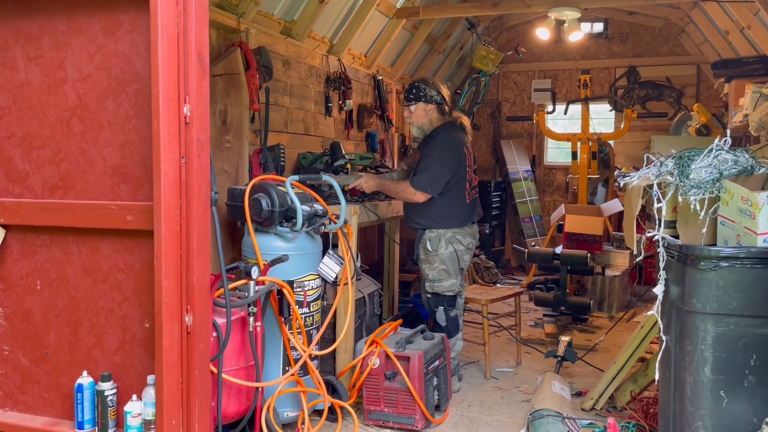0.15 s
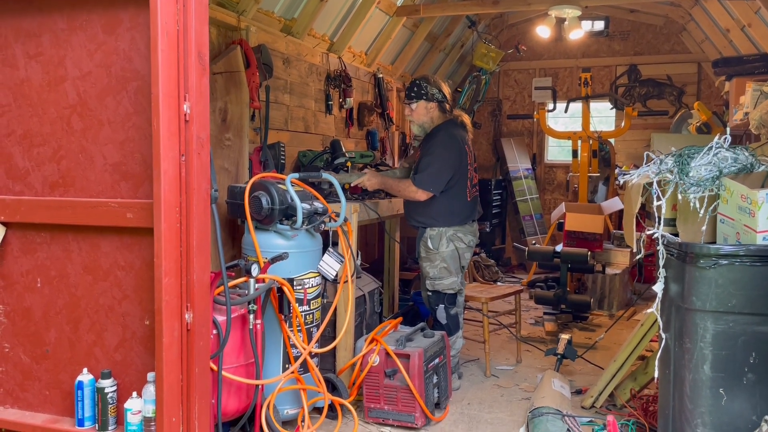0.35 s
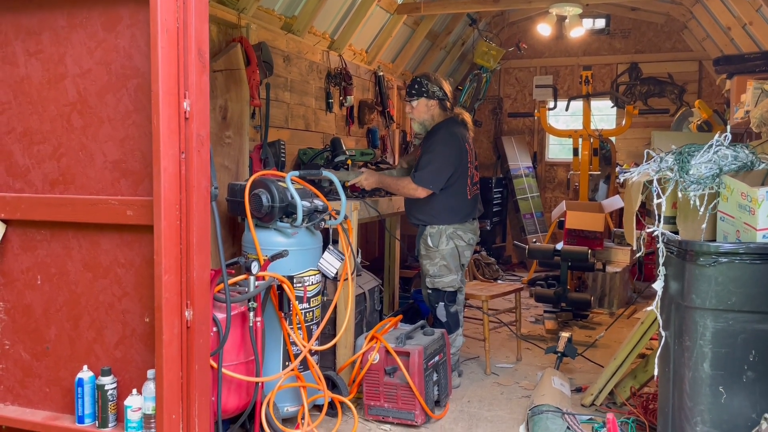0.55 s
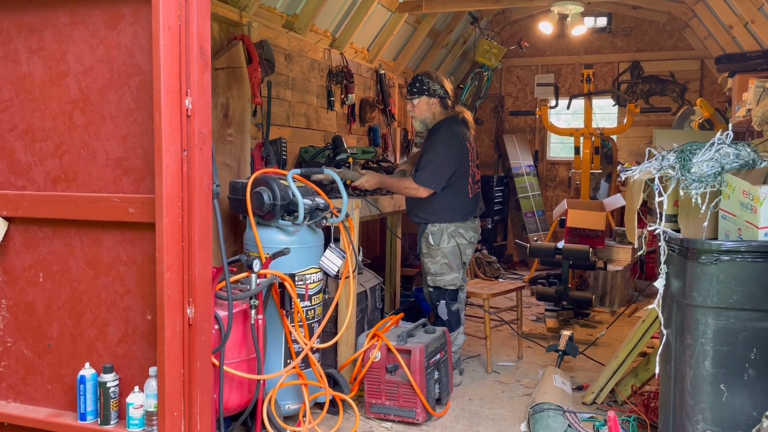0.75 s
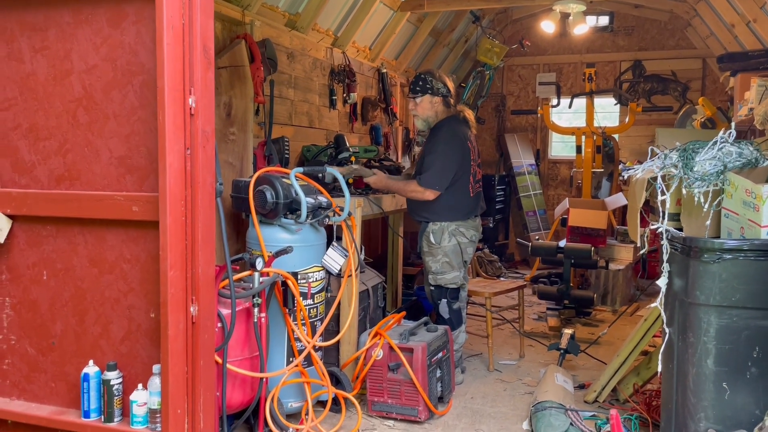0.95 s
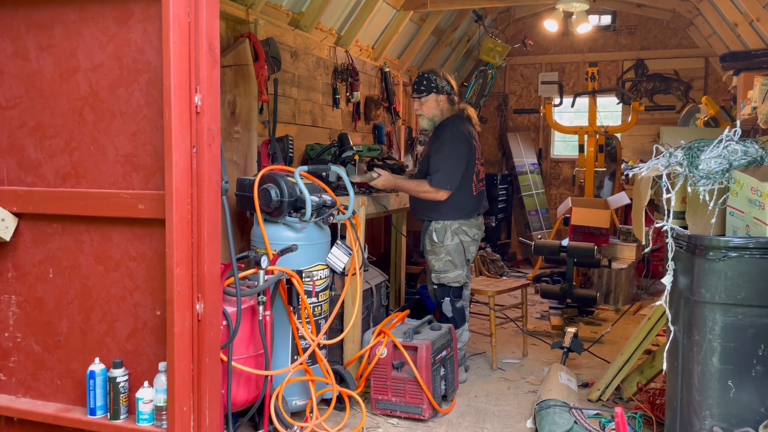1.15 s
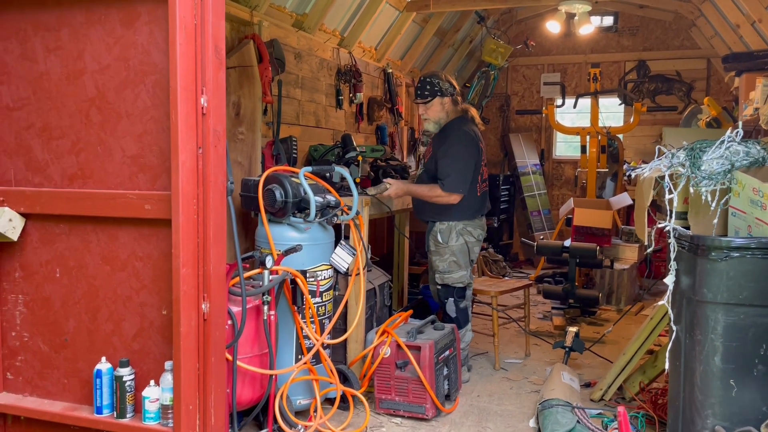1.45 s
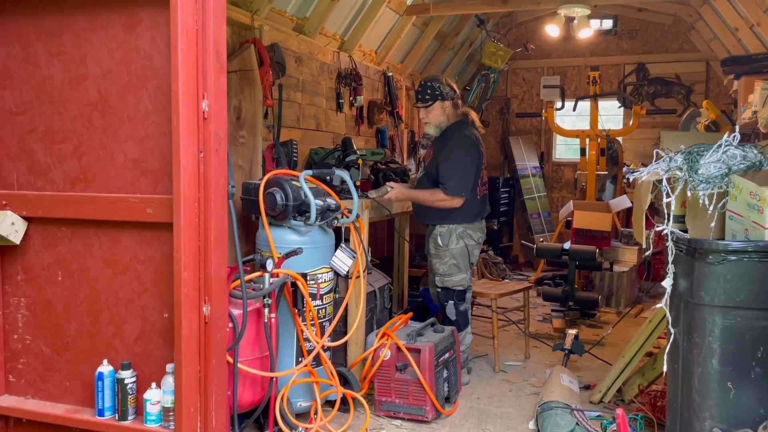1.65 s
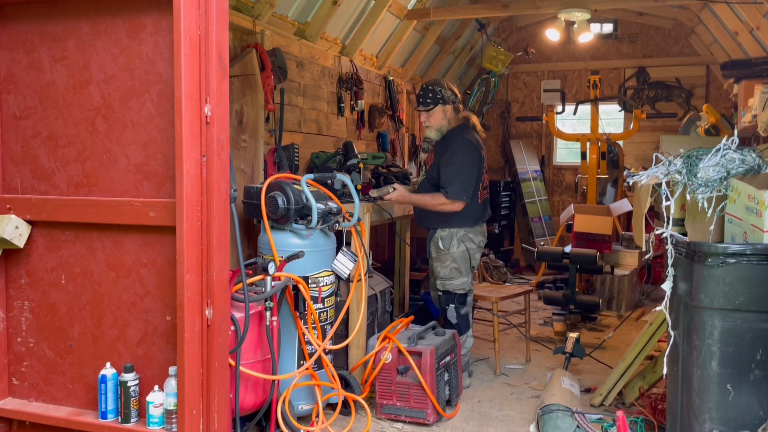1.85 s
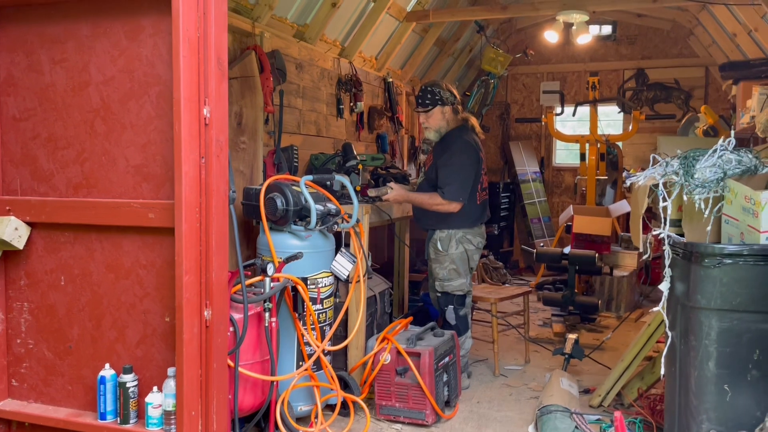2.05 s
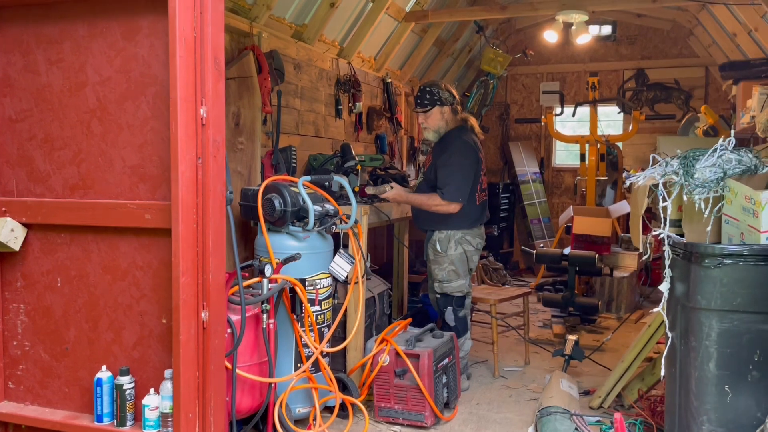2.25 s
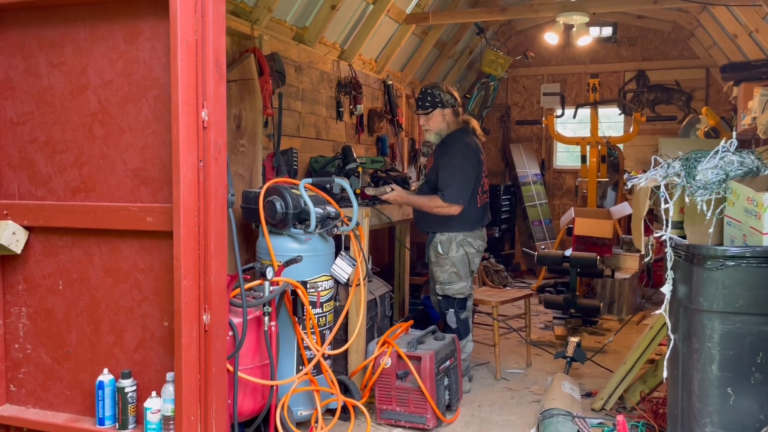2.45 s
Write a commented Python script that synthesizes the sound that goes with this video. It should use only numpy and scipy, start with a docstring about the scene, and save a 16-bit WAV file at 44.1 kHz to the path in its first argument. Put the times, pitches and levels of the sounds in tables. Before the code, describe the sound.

A power sander rasps on wood, then lifts off and idles with a low throb.

```python
"""A buzzing, rasping power sander is heard first, pressed on a wooden bar in a small shed. The small engine of
the generator feeding it sags with each push, while grit scrapes the wood and the bar rings and rattles. Near
0.9 s the pad lifts off, and the engine's drone falls an octave into a lighter throb, whose pattern repeats only
every second turn. A bird then sings faintly outside."""
import sys
import numpy as np
from scipy import signal
from scipy.fft import rfft, irfft
from scipy.io import wavfile

SR = 44100
rng = np.random.default_rng(int(sys.argv[2]) if len(sys.argv) > 2 else 0)


def to_wav(sig):
    """Store sig (one row per channel, or 1-D mono) as 16-bit WAV at the path in sys.argv[1].

    Samples outside -1..1 are clipped; the rate is SR.
    """
    pcm = np.clip(np.atleast_2d(sig), -1, 1) * 32767
    pcm = np.round(pcm).astype(np.int16)
    wavfile.write(sys.argv[1], SR, pcm.T)  # frames by channels


N = 114660
BIN_HZ = np.fft.rfftfreq(N, 1 / SR)
IDLE_S, IDLE_FADE_S = 0.894, 0.257  # middle and length of the change to the throb


def motor(turns):
    """Period doubling: the buzz repeats every turn, the unloaded throb every second turn."""
    # Partials under load. Each row: multiple of the turn rate, relative level in dB.
    loaded_partials = [(1, -6), (2, 1), (3, -3.5), (4, -5), (5, -7), (6, -14), (7, -10), (8, -24), (9, -18),
                       (10, -17.5), (11, -18.5), (12, -18.5), (13, -16), (14, -23), (15, -40), (16, -23.5),
                       (17, -19), (18, -35), (19, -23.5), (20, -27.5), (21, -24.5), (22, -20)]
    # Partials unloaded. Each row: multiple of half the turn rate, relative level in dB.
    idle_partials = [(1, -17), (2, -2.5), (3, 1), (4, -12.5), (5, -7.5), (6, -10), (7, -24), (8, -14),
                     (9, -31), (10, -15), (11, -19.5), (12, -22), (13, -14), (14, -11.5), (15, -22),
                     (16, -28.5), (17, -17), (18, -19), (19, -23), (20, -36), (21, -27), (22, -22.5),
                     (23, -20.5), (24, -20), (25, -31), (26, -18), (27, -40.5), (28, -33), (29, -37),
                     (30, -33), (31, -36), (32, -32.5), (33, -34.5), (34, -43), (35, -33.5), (36, -32),
                     (37, -25), (38, -35), (39, -35), (40, -30), (41, -33.5), (42, -40.5), (43, -29.5),
                     (44, -29.5), (45, -37.5), (46, -33), (47, -30), (48, -47.5)]
    # Envelope of the buzz. Each row: time in seconds, level in dB.
    buzz_db = [(0, -24), (.1, -23), (.26, -21.5), (.36, -21.5), (.48, -23.3), (.64, -21.5), (.82, -21.5),
               (.87, -26), (.91, -32), (.96, -41), (1.05, -83)]
    # Faint engine whines. Each row: frequency in Hz at 59.5 turns per second, level in dB.
    whines = [(1098, -58.5), (1190, -58), (3779, -73.5), (4721, -74)]
    buzz = drone(turns, loaded_partials, sharp=0.88, smear=0.1097, scatter=4.5, rough=0.34, spread=0.96)
    throb = drone(turns / 2, idle_partials, sharp=0, smear=1.3, scatter=3.3, rough=.14, spread=0.7)
    whine = sum(amp(db) * np.sqrt(2) * np.sin(2 * np.pi * hz * turns / 59.5) for hz, db in whines)
    throb_gain = amp(-23.5) * np.sqrt(ramp(IDLE_S, IDLE_FADE_S))
    return throb_gain * throb - amp(curve(buzz_db)) * buzz + whine


def rotation():
    """Turns are the integral of speed, which sags under load and hunts when the motor runs free."""
    # Motor speed. Each row: time in seconds, turns per second.
    speed = [(0, 58.1), (.11, 57.3), (.23, 58.2), (.32, 58.9), (.38, 57.8), (.45, 58.8), (.52, 57.3),
             (.6, 57.7), (.7, 59.1), (.8, 58.9), (.87, 59.6), (1.1, 59.5), (2.6, 59.5)]
    hunt_hz = 11 * (1 + 0.14 * wander(3.7))
    hunt = np.sin(2 * np.pi * np.cumsum(hunt_hz) / SR) * (1 + 0.13 * wander(3))
    unsteadiness = .004 * hunt * ramp(IDLE_S, IDLE_FADE_S) + .003 * wander(45)
    return np.cumsum(curve(speed) * (1 + unsteadiness)) / SR


def drone(cycles, partials, sharp, smear, scatter, rough, spread):
    """Fourier series of one thump per cycle; upper partials spread in time and waver the most."""
    orders, db = np.transpose(partials)
    log_gain = np.r_[db.min(), db, db.min(), db[::-1]] * np.log(10) / 20
    lags = np.imag(signal.hilbert(log_gain))[1:]  # minimum phase gives a sharp onset
    sides = np.array([[.5], [-.5]])
    tone, shared_waver = np.zeros((2, N)), wander(32)
    for n, level, lag in zip(orders, db, lags):
        height = n / orders[-1]
        astray, apart = height * rng.standard_normal(2)
        offset = scatter * astray + spread * apart * sides - sharp * lag - smear * n ** 2
        waver = 1 + rough * np.sqrt(height) * (shared_waver + wander(12))
        tone += amp(level) * waver * np.cos(2 * np.pi * n * cycles + offset)
    return unit(tone) * amp(-3 * sides)  # 3 dB stronger on the right


def sanding(turns):
    """Friction noise: grit rasps in a surge per turn, hisses when pushed hard, and catches twice."""
    # Pressure of the abrasive. Each row: time in seconds, relative rasp level in dB.
    pressure = [(0, -43.5), (.04, -45), (.09, -41.5), (.15, -38.5), (.26, -37), (.31, -44.5), (.352, -48.5),
                (.375, -40), (.42, -48.5), (.46, -41), (.51, -44.5), (.55, -49.5), (.565, -45), (.605, -42),
                (.68, -51.5), (.79, -57), (.87, -60), (.95, -63)]
    # Spectra of the rasp and the fine hiss. Each row: frequency in Hz, relative density in dB.
    rasp_spectrum = [(500, -29), (950, -11), (1200, -4), (1450, 1.5), (1800, -5.5), (2100, 0.5),
                     (2400, -6.5), (2600, -8), (3500, -12), (3900, -9.5), (5000, -13), (7300, -19.5),
                     (9000, -34), (13000, -44)]
    hiss_spectrum = [(500, -38), (5000, -23), (7500, -4), (9500, -0.5), (10800, 4.5), (11800, -5),
                     (13700, -13)]
    # The abrasive catches on the wood. Each row: start in seconds, initial level in dB.
    catches = [(0.362, -36), (0.558, -30.5)]
    contact = 1 - ramp(0.89, 0.24)  # the pad lifts
    push = amp(curve(pressure) + 0.92 * wander(40)) * pulses(turns, depth=0.9, decay_cycles=0.32)
    rasp_db = spectrum(rasp_spectrum)
    rasp = push * amp(6.5) * mic_pair(grit(), amp(rasp_db))
    wood = bar(turns)
    hiss = amp(-45.5) * (push / amp(-38)) ** 0.96 * mic_pair(grit(), amp(spectrum(hiss_spectrum)))
    snag, t = np.zeros(N), np.arange(SR // 10) / SR
    for start, db in catches:
        add(snag, start, amp(db) * np.exp(-t / 0.0099))
    return contact * (rasp + wood + hiss) + snag * mic_pair(grit(), amp(0.5 * rasp_db))


def grit():
    """Shot noise: many tiny scratches of uneven size, in two independent streams."""
    per_second, spread_db = 9000, 1.5
    size = amp(spread_db * np.minimum(rng.exponential(1, N), 4))
    struck = rng.random(N) < per_second / SR
    return unit(size * struck * rng.standard_normal((2, N)))


def bar(turns):
    """Forced vibration: grit rings the bar and the sander's shell, and the bar rattles on the bench."""
    # Modes of bar and shell. Each row: frequency in Hz, width in Hz, relative level in dB.
    modes = [(592, 147, -1), (990, 67, -0.5), (1190, 205, -1), (1700, 110, -0.5), (1818, 164, 3),
             (2366, 120, -4.5), (2730, 55, -10), (3460, 84, -13), (3820, 110, -11), (4094, 52, -8),
             (4540, 46, -13), (5160, 69, -15.5), (6020, 90, -21)]
    # Envelopes of the ringing and the rattle. Each row: time in seconds, relative level in dB.
    ring_db = [(0, -40), (.05, -41.5), (.09, -28), (.25, -27), (.3, -37), (.35, -41.5), (.38, -32),
               (.42, -36), (.47, -41), (.55, -36), (.565, -30.5), (.6, -28), (.625, -40), (.7, -38),
               (.8, -40.5), (.87, -46), (.95, -51)]
    rattle_db = [(0, -34.5), (.04, -32.5), (.13, -28.5), (.25, -32), (.33, -34.5), (.4, -29.5),
                 (.46, -35.5), (.53, -32.5), (.66, -29), (.75, -37), (.8, -29), (.86, -34.5), (.93, -42)]
    # Spectrum of the rattle. Each row: frequency in Hz, relative density in dB.
    rattle_spectrum = [(30, -47), (70, 6.5), (150, -9.5), (330, 6), (480, -2.5), (720, 1), (870, -14),
                       (1020, -8.5), (1500, -12.5), (2100, -17), (3000, -26), (8000, -52)]
    response = sum(amp(db) / (1 + 2j * (BIN_HZ - hz) / width) ** 2 for hz, width, db in modes)
    ring = mic_pair(grit() * pulses(turns, depth=1.4, decay_cycles=0.28), response)
    knocks = grit() * pulses(turns, depth=1.3, decay_cycles=0.33)
    rattle = mic_pair(knocks, amp(spectrum(rattle_spectrum)))
    return amp(curve(ring_db) - 0.5) * ring + amp(curve(rattle_db) + 2.5) * rattle


def clatter(turns):
    """Amplitude modulation: mechanical noise and exhaust hiss pulse with the engine."""
    # Spectrum of the engine noise. Each row: frequency in Hz, relative density in dB.
    noise_spectrum = [(25, -41), (80, -16.5), (270, -23), (400, -17.5), (470, -29), (600, -26), (770, -27),
                      (860, -32.5), (1150, -32.5), (1650, -34), (2600, -40.5), (4800, -50.5), (7300, -59),
                      (9700, -60.5), (13000, -68)]
    gate = pulses(turns / 2, depth=0.33, decay_cycles=0.4) * pulses(turns, depth=0.56, decay_cycles=0.19)
    return amp(-37.5) * mic_pair(gate * rng.standard_normal((2, N)), amp(spectrum(noise_spectrum)))


def shed(direct):
    """Reverberation: dense reflections from the plank walls die away exponentially."""
    t60_s, delay_s, per_second, wet = 0.31, .004, 2000, amp(-6)
    t = np.arange(SR // 2) / SR
    tail = rng.standard_normal(len(t)) * (rng.random(len(t)) < per_second / SR)
    tail *= (t > delay_s) * amp(-60 * t / t60_s)
    reflections = signal.fftconvolve(direct, tail[None] / np.linalg.norm(tail), axes=1)[:, :N]
    return (direct + wet * reflections) / np.hypot(1, wet)


def bird():
    """Frequency modulation: gliding whistles from outside, blurred by echoes."""
    # Song. Each row: start and length in seconds, first, middle and last pitch in Hz, relative dB.
    notes = [(1.407, .04, 2520, 2705, 2800, -55), (1.495, 0.081, 3320, 3450, 3320, -55),
             (1.836, 0.055, 3210, 2950, 2940, -51), (1.895, .09, 3070, 3460, 3230, -49),
             (1.928, 0.048, 2500, 2540, 2720, -51), (1.995, .045, 2690, 2470, 2240, -49),
             (2.237, 0.037, 2710, 2800, 2846, -59), (2.31, 0.069, 3150, 3380, 3420, -52),
             (2.373, 0.031, 2900, 3118, 3400, -49.5), (2.437, 0.07, 2720, 2550, 2400, -50.5),
             (2.524, 0.032, 2690, 2540, 2420, -48)]
    song = np.zeros(N)
    for start, length, first, middle, last, db in notes:
        progress = np.arange(0, length, 1 / SR) / length
        hz = np.polyval(np.polyfit([0, .5, 1], [first, middle, last], 2), progress)
        envelope = amp(db) * np.sqrt(2 * abs(np.sin(np.pi * progress)))
        add(song, start, envelope * np.sin(2 * np.pi * np.cumsum(hz) / SR))
    t = np.arange(SR // 3) / SR
    tail = rng.standard_normal((2, len(t))) * np.exp(-t / .03)
    echoes = signal.fftconvolve(song[None], tail / np.linalg.norm(tail[0]), axes=1)[:, :N]
    return amp(-3) * (song + amp(-4) * echoes)


def mic_pair(drives, gain):
    """Partial coherence: two unrelated drives are coloured and blended as two microphones hear them."""
    # Likeness of left and right. Each row: frequency in Hz, coherence from 0 to 1.
    likeness = [(60, .995), (280, .985), (600, .96), (1300, .92), (2800, .62), (6000, .35), (7300, .5),
                (7750, .995), (8800, .995), (9200, .5), (13000, .35)]
    # Balance. Each row: frequency in Hz, left minus right in dB.
    balance = [(60, -9), (360, 0.5), (1200, -2), (2200, -2), (3900, 5), (7000, 2), (7700, -6), (13000, 2.5)]
    # Phase between the microphones. Each row: frequency in Hz, lead of the left in radians.
    lead = [(60, 0), (1700, .1), (2300, .6), (3300, 1.), (4050, .4), (5300, .6), (6900, -1.2), (7750, -3.1),
            (8800, -3.2), (9500, -4.4), (11000, -5.8), (13000, -6.6)]
    common, separate = rfft(drives)
    coherence, side_db = spectrum(likeness), spectrum(balance)
    left = common * amp(side_db / 2) * np.exp(1j * spectrum(lead))
    right = (coherence * common + np.sqrt(1 - coherence ** 2) * separate) * amp(-side_db / 2)
    return unit(irfft(np.array([left, right]) * gain, N))


def pulses(cycles, depth, decay_cycles):
    """A kick that decays exponentially within each cycle."""
    return unit(1 + depth * np.exp(-(cycles % 1) / decay_cycles))


def amp(db):
    """Decibels to amplitude."""
    return 10 ** (np.asarray(db) / 20)


def unit(x):
    """Normalisation to rms 1."""
    return x / np.sqrt(np.mean(x ** 2) + 1e-20)


def curve(points):
    """Linear interpolation in time."""
    return np.interp(np.arange(N) / SR, *np.transpose(points))


def spectrum(points):
    """Interpolation on a log-frequency axis."""
    hz, value = np.transpose(points)
    return np.interp(np.log(BIN_HZ + 1), np.log(hz + 1), value)


def ramp(middle_s, length_s):
    """A sinusoidal step from 0 to 1."""
    return .5 + .5 * np.sin(np.pi * np.clip((np.arange(N) / SR - middle_s) / length_s, -.5, .5))


def wander(hz):
    """Low-pass noise: a random drift up to about hz."""
    return unit(irfft(rfft(rng.standard_normal(N)) / (1 + (BIN_HZ / hz) ** 4), N))


def add(mix, start_s, sound):
    """Superposes a sound on the mix."""
    part = mix[..., round(start_s * SR):][..., :sound.shape[-1]]
    part += sound[..., :part.shape[-1]]


def scene():
    """Superposition: one rotation drives motor, clatter and sanding; the bird is independent."""
    turns = rotation()
    return motor(turns) + clatter(turns) + shed(sanding(turns)) + bird()


def record(dry):
    """Band limiting: a low-pass filter cuts the treble above 13.7 kHz."""
    lowpass = signal.firwin(511, 13700, window=("kaiser", 9), fs=SR)
    return signal.oaconvolve(dry, lowpass[None], "same")


dry = scene()
out = record(dry)
to_wav(out)
```